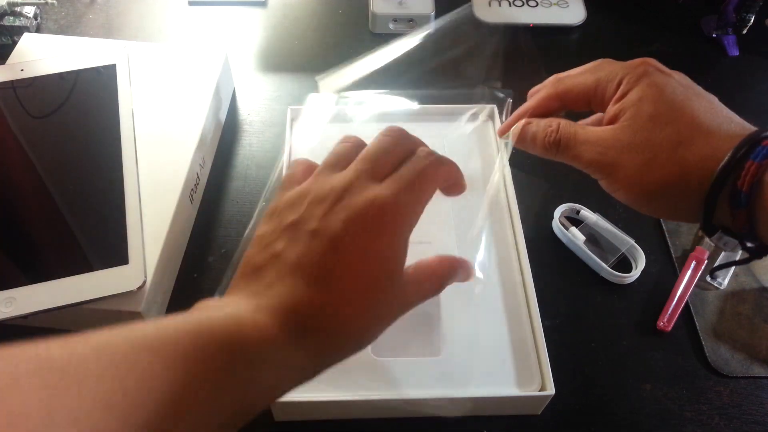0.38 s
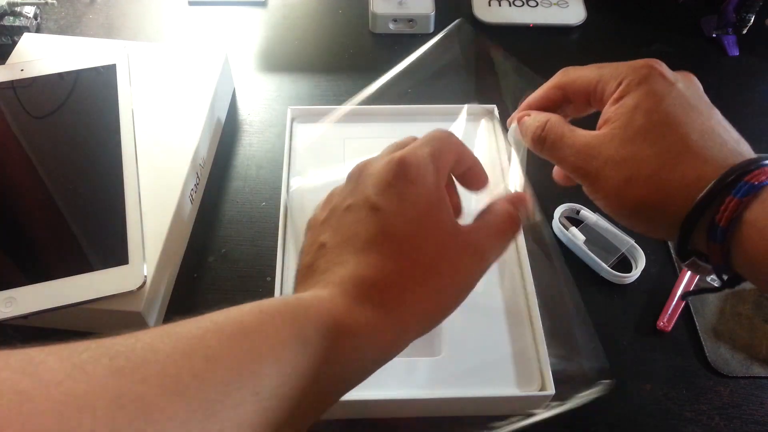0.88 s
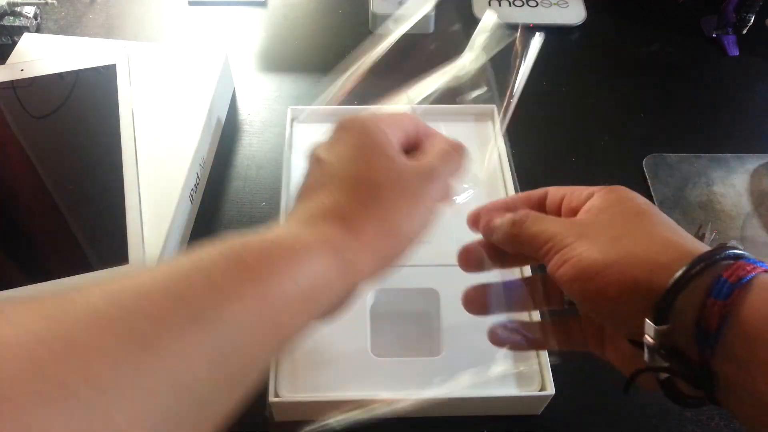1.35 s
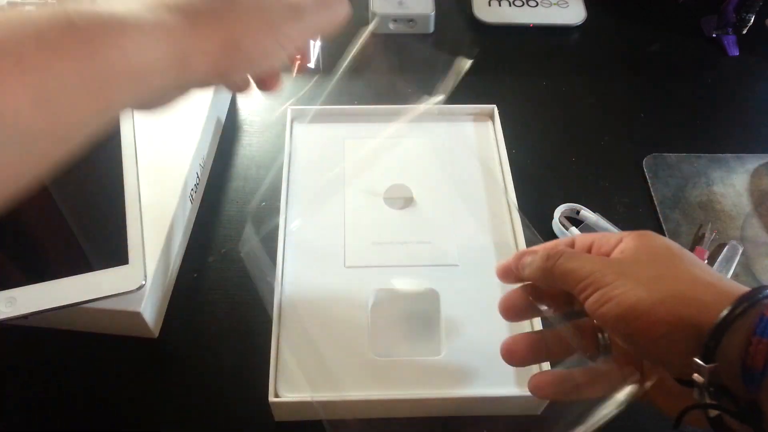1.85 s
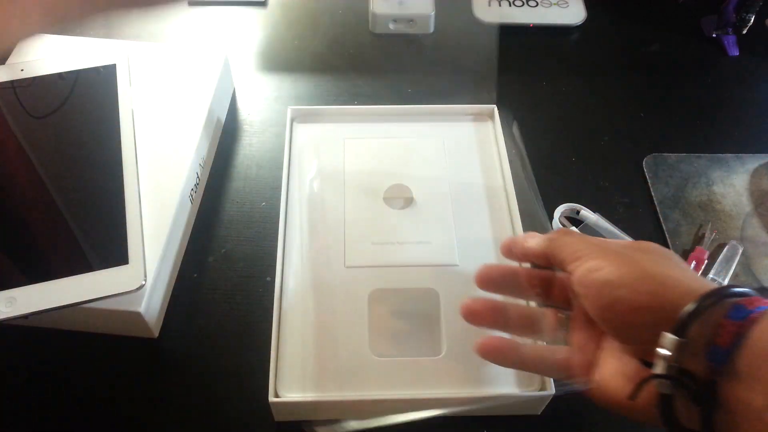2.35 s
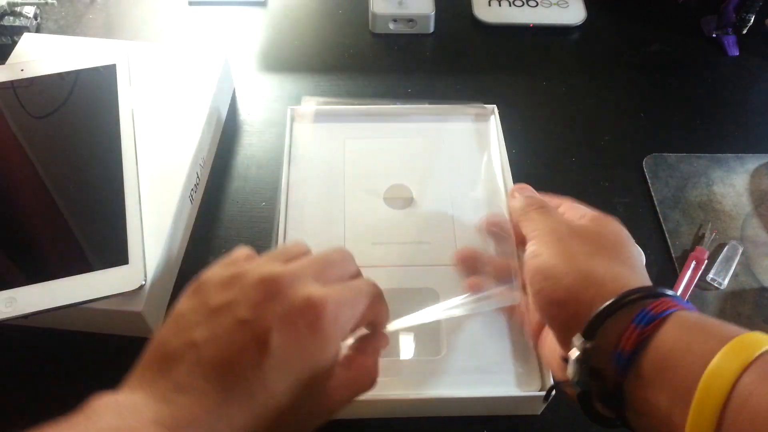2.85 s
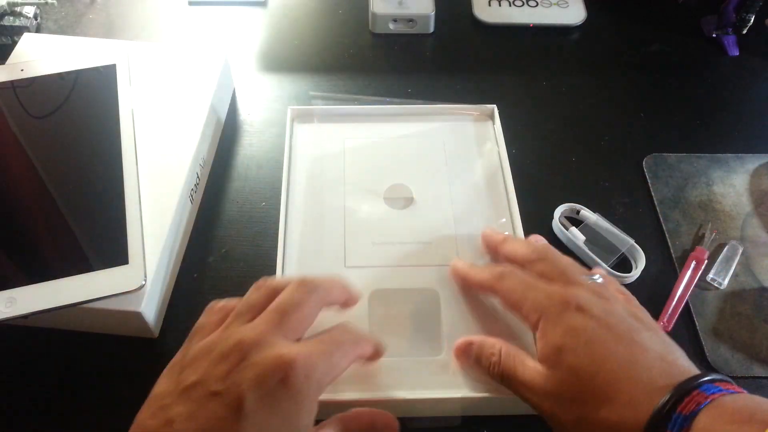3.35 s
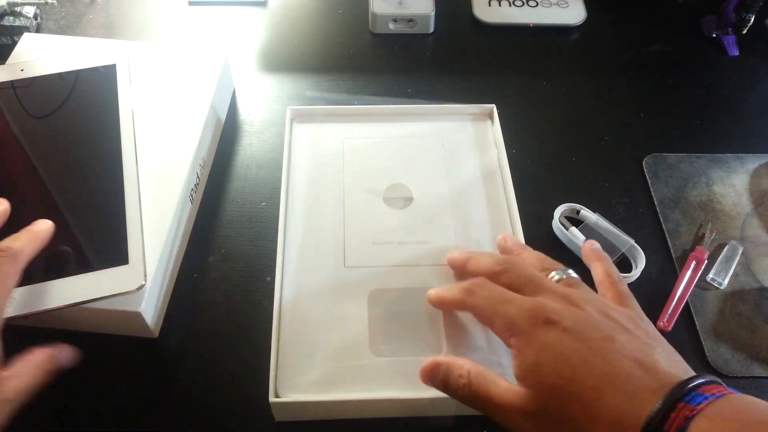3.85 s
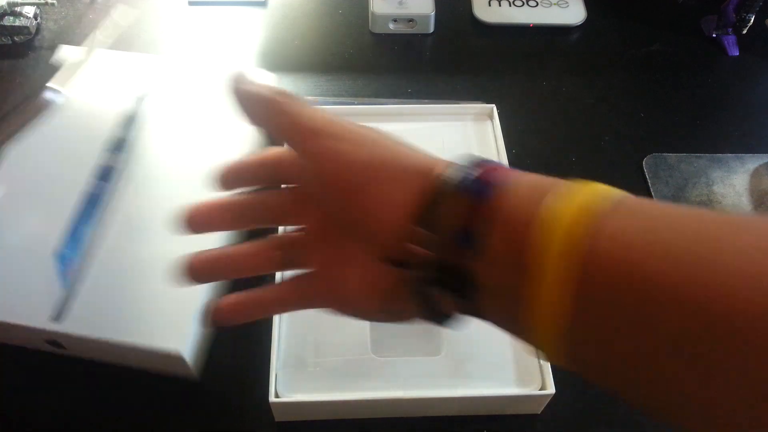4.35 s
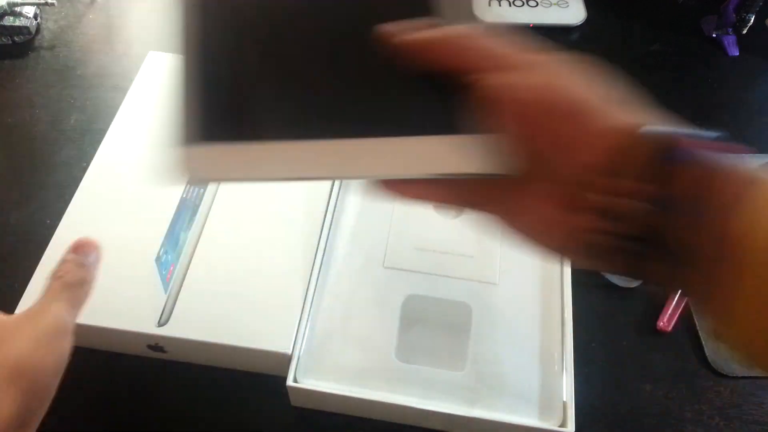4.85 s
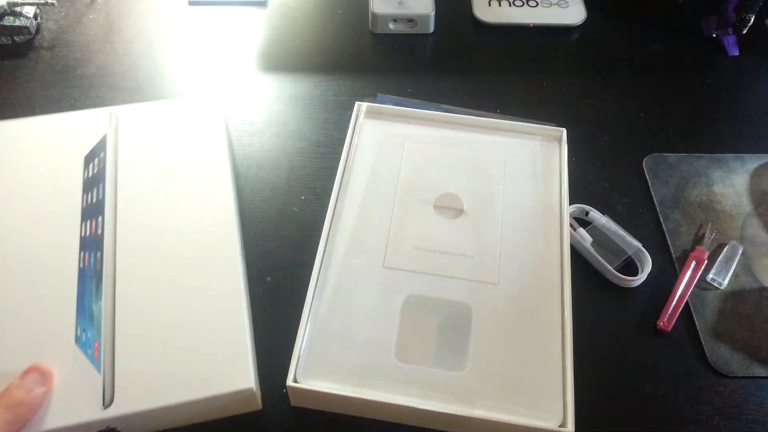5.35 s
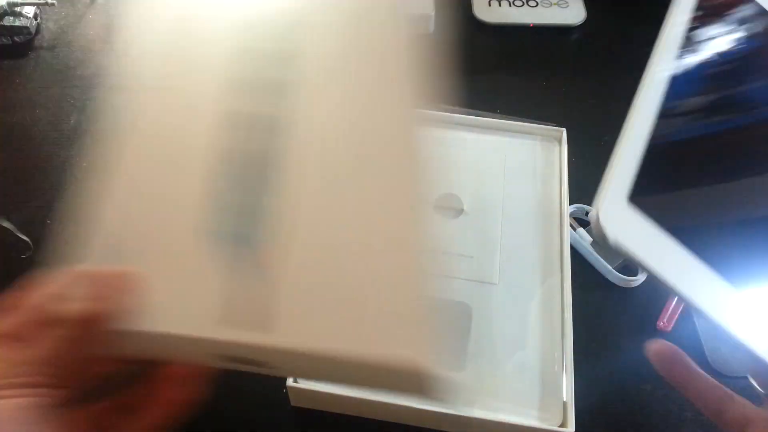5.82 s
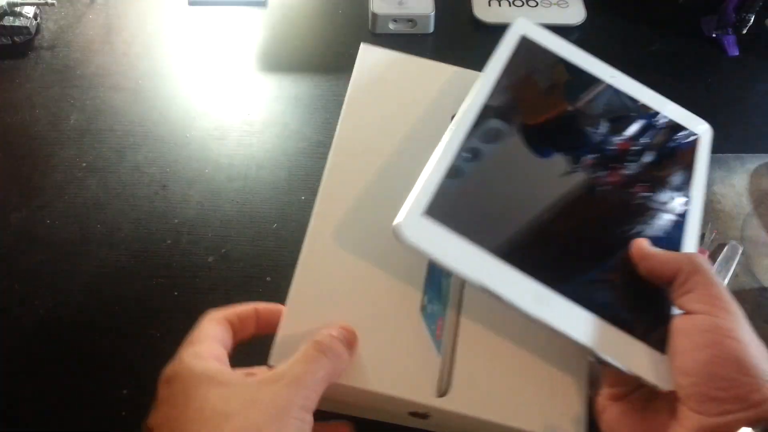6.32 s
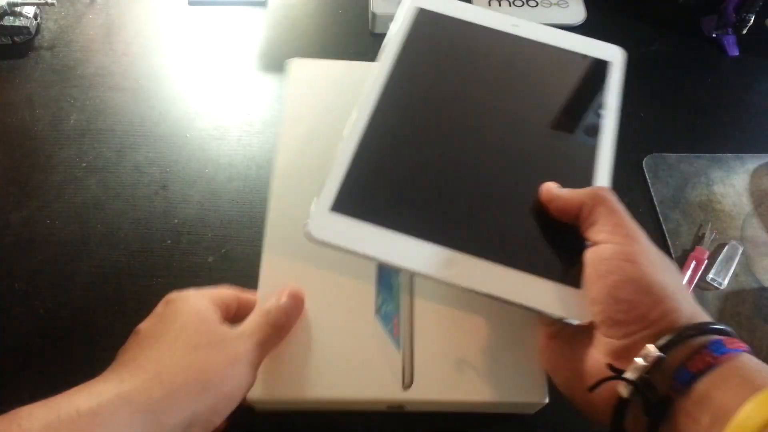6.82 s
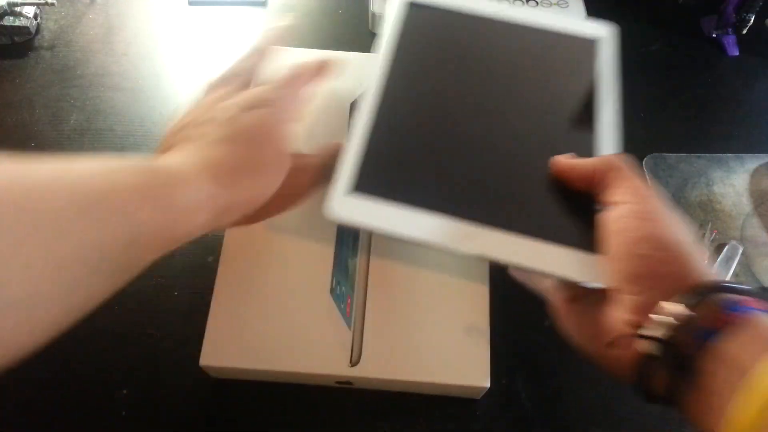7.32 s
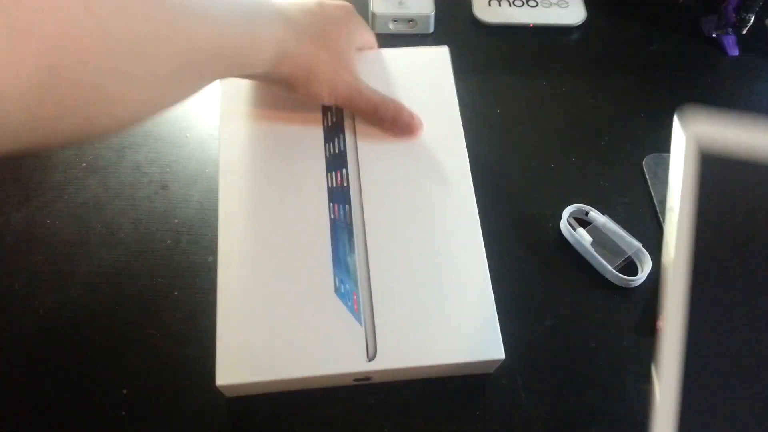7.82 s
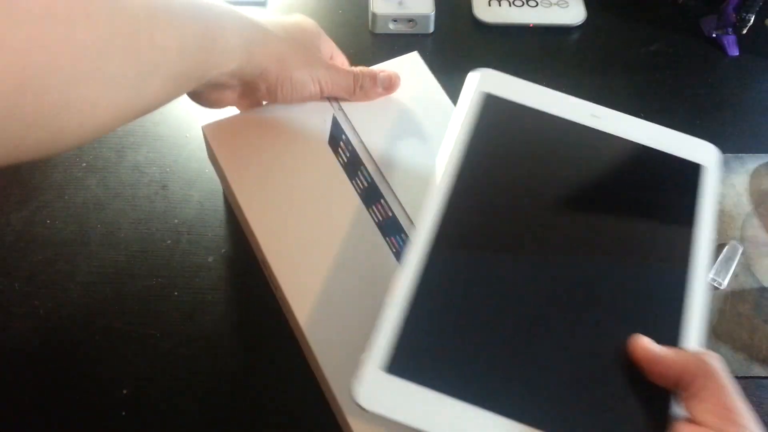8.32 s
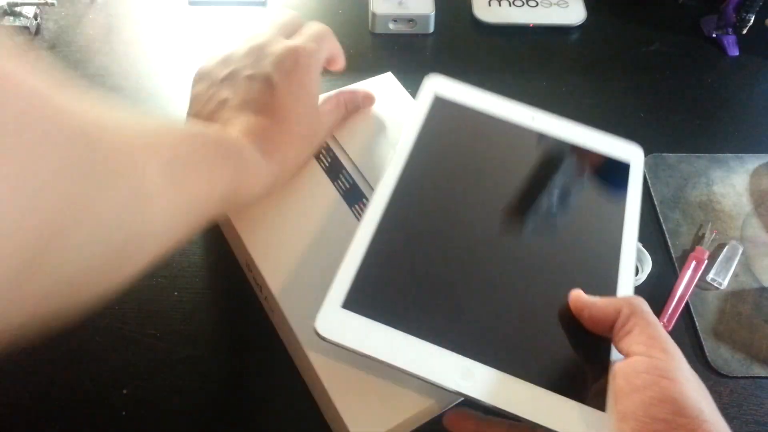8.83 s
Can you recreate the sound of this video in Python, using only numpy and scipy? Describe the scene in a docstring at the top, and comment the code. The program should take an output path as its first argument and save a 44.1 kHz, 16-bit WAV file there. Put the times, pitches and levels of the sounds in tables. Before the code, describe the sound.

Sharp plastic crinkling bursts in a small room, followed by a wavering cardboard drag hum, boxy thuds, shuffling and soft palm swishes.

```python
"""Stiff film and a cardboard box

Hands lift a stiff clear film off a cardboard tray: creases snap as ringing panels, grains of noise crinkle.
The hollow lid is dragged over the desk with a wavering hum, set down on the tray and patted shut: blows and
judders ring the box modes, friction drones and hisses, and palms wipe the card in short bright swishes.
A small furnished room adds diffuse echoes, air noise, rumble and a faint mains hum; two spaced microphones."""
import sys
import numpy as np
from scipy import signal
from scipy.fft import rfft, irfft, next_fast_len
from scipy.io import wavfile
from scipy.ndimage import uniform_filter1d

SR = 44100
rng = np.random.default_rng(int(sys.argv[2]) if len(sys.argv) > 2 else 0)


def transcribe(signal):
    """Save signal, clipped to [-1, 1], as a 16-bit WAV file at the path in sys.argv[1]."""
    frames = np.atleast_2d(signal).T
    limited = np.clip(frames, -1, 1)
    pcm = np.round(limited * 32767).astype(np.int16)
    wavfile.write(sys.argv[1], SR, pcm)


def rack_gain(trim_db):
    """Turn a fader trim in dB into the linear factor to multiply a signal by."""
    fader = np.asarray(trim_db, float)
    return 10 ** (fader / 20)


N = 405262

# creases of the film buckling, tick and crackle against the panel:
# start_s [s], level_db [dB], panel_hz [Hz], treble_db [dB], crackle_db [dB]
CREASES = [(0.0838, -29, 2600, -35, 8), (0.12, -38, 1160, -25, 0), (0.1354, -8, 3760, -34, -3),
           (0.3142, -37, 1390, -13.5, 4), (0.3862, -27, 2920, -39, 11), (0.449, -20.5, 2620, -31, -10),
           (0.502, -35, 1090, -25, 0.5), (0.5275, -31, 1280, -29, 0), (0.5457, -39, 3670, -21, 1.5),
           (0.5573, -21.5, 1220, -10, 16.5), (0.573, -38.5, 1290, 4, 8.5), (0.6668, -25.5, 2800, -15, 8),
           (0.6707, -21.5, 2350, -25, 3.5), (0.816, -47, 3890, -10, -29), (0.8804, -24.5, 4030, -23, -4.5),
           (0.9308, -23.5, 3950, 8, -4.5), (0.9446, -10, 3154, 1.5, 3.5), (1.0134, -30, 1060, -3, 9),
           (1.0517, -22, 4630, -9, -2), (1.0563, -11, 4460, -13.5, 3.5), (1.061, -13, 5500, -14, -10),
           (1.1601, -30.5, 1351, -29, 5.5), (1.2678, -21.5, 3360, -33.5, -11),
           (1.2914, -28.5, 1452, -40.5, -2), (1.3423, 0.5, 4214, -21.5, -3), (1.3488, 2.5, 4264, -4.5, 1),
           (1.3536, -1.5, 3900, -11, 5.5), (1.368, -2.5, 4756, 0.5, -4), (1.3717, -4, 1251, 8.5, -1.5),
           (1.3814, -7, 3000, 1, 10), (1.3966, -3.5, 4296, -8.5, -1.5), (1.4072, -1.5, 5160, -20.5, -2),
           (1.507, -23, 2750, -3.5, -2), (1.6046, -10, 3480, -20.5, 7.5), (1.6097, -3.5, 3400, -6.5, -1.5),
           (1.6134, -4.5, 3345, 5.5, -1), (1.6346, -2.5, 3514, -2, 2), (1.6816, -5, 2768, 1, 5),
           (1.7353, -0.5, 2840, -3, 5.5), (1.7374, 3.5, 3000, -5.5, -1), (1.7532, -2, 2850, -16, -2.5),
           (1.7565, -4.5, 2807, 3.5, -3.5), (1.79, 3, 3740, -10, -2.5), (1.795, 0, 3890, -10, -6.5),
           (1.8025, -1.5, 3730, -8.5, -0.5), (1.8124, 4.5, 3890, -6.5, -4.5), (1.8185, 0.5, 3880, 2, -12),
           (1.8219, 0.5, 3520, -11.5, -3), (1.8285, 1, 3866, -13, -0.5), (1.8355, 0.5, 3920, -1, -5.5),
           (1.8438, -3, 3790, -27, 0), (1.8481, -2.5, 3916, -19.5, -7.5), (1.8791, -5.5, 4950, -14.5, 0),
           (1.9056, 0.5, 3894, -2.5, 3), (1.9143, 1.5, 2675, -1, -6), (1.9245, -2, 3810, -13, 8.5),
           (1.9619, -6.5, 1870, -7.5, 0), (1.964, -2.5, 6000, -9, -0.5), (2.1254, -39.5, 1790, -6.5, 1.5),
           (2.212, -44.5, 2810, 13.5, 1), (2.3467, -42.5, 2060, -40.5, 16.5), (2.498, -52.5, 4060, 5.5, -5),
           (2.5592, -25.5, 3900, -26, -7), (2.582, -24.5, 4070, -30, -13), (2.652, -51.5, 3410, -22, 4),
           (2.7761, -34, 2130, -21, -4), (2.8366, -34.5, 1260, -2.5, 4), (2.888, -43, 2220, 2, 1),
           (2.936, -25, 1250, -31, -14), (2.949, -15, 5493, -17.5, 0.5), (3.2247, -29.5, 2760, -2, -19),
           (3.333, -24.5, 1450, -8, -12), (3.394, -38, 4950, -14, 5), (3.4251, -25, 1360, -58, 5.5),
           (3.5083, -34, 2100, -33, -17), (3.538, -45, 2220, 1, -1), (3.8228, -34.5, 1650, -24.5, 10.5),
           (3.839, -14.5, 2430, -29, -7.5), (3.8598, -24.5, 1570, -37, 0.5), (3.972, -49, 1000, -15, -6)]
# modes of the hollow box when free to ring: pitch_hz [Hz], level_db [dB, relative], t60_s [s]
BOX_MODES = [(106, -17, 0.1), (131.6, -13, 0.11), (196.5, -12.5, 0.076), (239.8, -5.5, 0.18),
             (291, 2.5, 0.066), (365, 0, 0.14), (449, -4.5, 0.097), (476.8, -9.5, 0.13), (523, -9.5, 0.1),
             (621.4, -13.5, 0.14), (756, -23, 0.16), (840, -7, 0.039), (1024, -7, 0.052),
             (1220, -9.5, 0.022), (1390, -12, 0.049), (1660, -20, 0.053), (2110, -44, 0.011)]
# how alike the two microphones hear a diffuse sound: pitch_hz [Hz], likeness [0-1]
STEREO_LIKENESS = [(60, 0.78), (180, 0.94), (550, 0.39), (1650, 0.27), (4970, 0.2), (15000, 0.011)]


def rms_one(x):
    """Scale to unit rms."""
    return x / np.sqrt(np.mean(x ** 2) + 1e-20)


def in_time(rows):
    """Columns of a curve at every sample, with a mask that is true only within its span."""
    s, *columns = np.transpose(rows)
    t = np.arange(N) / SR
    return (t >= s[0]) & (t <= s[-1]), [np.interp(t, s, c) for c in columns]


def at_hz(points, hz):
    """Read a spectrum on a log-frequency axis."""
    point_hz, values = np.array(points).T
    return np.interp(np.log(hz), np.log(point_hz), values)


def drift(rate_hz):
    """Slow random wander of spread 1: noise through two equal poles, run at a fortieth of the sample rate."""
    r = np.exp(-80 * np.pi * rate_hz / SR)
    noise = rng.standard_normal(N // 40 + 2002)
    slow = signal.lfilter([1], [1, -2 * r, r * r], noise)[2000:]   # drop the filter's start-up
    return np.interp(np.arange(N) / 40, np.arange(len(slow)), rms_one(slow))


def ring(drive, hz, t60_s):
    """A resonator: a unit click sets a sine of about height 1 ringing, 60 dB down after t60_s."""
    r, w = rack_gain(-60 / (t60_s * SR)), 2 * np.pi * hz / SR
    return signal.lfilter([0, np.sin(w)], [1, -2 * r * np.cos(w), r * r], drive + 1e-18)


def coloured(pair, spectrum):
    """Give two unrelated signals a spectrum and mix them to stereo that parts towards the treble; rms 1."""
    size = next_fast_len(N)
    hz = np.maximum(np.arange(size // 2 + 1) * SR / size, 1)
    alike = np.clip(at_hz(STEREO_LIKENESS, hz), 0, 1)
    mid, side = rfft(pair, size) * rack_gain(at_hz(spectrum, hz))
    stereo = np.sqrt(1 + alike) * mid + np.sqrt(1 - alike) * side * [[1], [-1]]
    return rms_one(irfft(stereo, size)[:, :N])


def brightened(x, bright_db, corner_hz):
    """Raise or lower the treble above a corner, by a fixed or moving amount."""
    low = signal.sosfiltfilt(signal.butter(1, corner_hz, fs=SR, output="sos"), x)
    return low + rack_gain(bright_db) * (x - low)


def grains(per_s, spread_db, clump_db):
    """Tiny noise clicks of uneven size that come in clumps, the same moments at both microphones."""
    born = rng.random(N) < per_s * rack_gain(clump_db * drift(25)) / SR
    sizes = rack_gain(spread_db * np.minimum(rng.exponential(1, N), 4))
    smear = np.exp(-np.arange(128) / 25.0)   # each grain dies away over 25 samples
    return np.convolve(born * sizes, smear)[:N] * rng.standard_normal((2, N))


def snaps(rows, cycles, second_db, after_ms):
    """A stiff sheet pops: the panel rings, 60 dB down in some cycles, with a sharp tick and a dying crackle."""
    out, t = np.zeros((2, N + 4096)), np.arange(4096) / SR
    treble = signal.butter(1, [5000, 12000], "band", fs=SR, output="sos")
    for s, level_db, hz, treble_db, crackle_db in rows:
        noise, chance = rng.standard_normal((3, 2, len(t))), rng.random(4)
        lag = np.array([[0], [(chance[0] - .5) * 1.0e-4]])   # s; the microphones are a few cm apart
        panel = np.sin(2 * np.pi * hz * (t + lag)) * rack_gain(-60 * t * hz / cycles)
        other_hz = hz * (0.89 + chance[1])   # a smaller facet beside it
        facet = np.sin(2 * np.pi * other_hz * (t - lag)) * rack_gain(-60 * t * other_hz / cycles)
        panel += rack_gain(second_db) * facet
        tick = rack_gain(treble_db) * signal.sosfilt(treble, noise[0] * np.exp(-t / 0.00091))
        around = signal.butter(1, [hz * 0.65, min(hz * 1.244, 18000)], "band", fs=SR, output="sos")
        flicker = np.abs(uniform_filter1d(noise[2, 0], size=24)) * 3.6 + .5
        dying = np.exp(-t / (max(after_ms, .3) / 1000)) * flicker
        # low pitches are alike at both microphones
        shared = noise[1, 0] + min(hz / 5000, 1) * noise[1, 1] * [[1], [-1]]
        crackle = signal.sosfilt(around, shared * dying)
        crackle = crackle + .5 * rack_gain(treble_db) * signal.sosfilt(treble, noise[2] * dying)
        at = round(s * SR)
        out[:, at:at + len(t)] += rack_gain(level_db) * (panel + tick + rack_gain(crackle_db) * crackle)
    return out[:, :N]


def film_crackle():
    """The flexed film crackles finely; each snap stirs the crackle up and it fades again."""
    # film being flexed: start_s [s], crackle_db [dB], bright_db [dB of treble]
    flex = [(0.0, -42, -11), (0.2, -43.5, -4.5), (0.3, -47, -2), (0.5, -60, -2), (0.8, -48, 0.5),
            (1.0, -70, 2), (1.3, -45.5, -3.5), (1.45, -33, 7), (1.58, -41.5, 5), (1.8, -44, 1),
            (1.98, -30, 2.5), (2.14, -51, -0.5), (2.25, -50, 12), (2.33, -38.5, -8.5), (2.42, -66, -16.5),
            (2.54, -64.5, 7.5), (2.6, -47, 6.5), (2.92, -53, -0.5), (3.12, -54.5, 1.5), (3.42, -42.5, -7.5),
            (3.6, -49, -5), (3.7, -60, -4), (3.81, -57, -3), (4.05, -61.5, -12.5)]
    # colour of the film: pitch_hz [Hz], level_db [dB per Hz, relative]
    film_spectrum = [(88, -48.5), (150, -14), (371, 0.5), (701, -12), (1160, -0.5), (1490, -7.5),
                     (2020, -5.5), (3890, -6), (4370, -7), (13900, -29.5), (15000, -18.5)]
    settle_db, settle_follows, settle_db_per_s = -23, 0.48, 228.5   # share of the snap's dB; fade
    loose_db = -8.5   # small creases popping at random, against the flex level
    moving, (flex_db, bright_db) = in_time(flex)
    s, level_db, _, _, crackle_db = np.transpose(CREASES)
    fade_db = settle_db_per_s * np.arange(N) / SR
    stirred_db = np.full(N, -200.)
    stirred_db[(s * SR).astype(int)] = settle_db + settle_follows * (level_db + crackle_db)
    settling_db = np.maximum.accumulate(stirred_db + fade_db) - fade_db
    fine = coloured(grains(per_s=3500.0, spread_db=2.5, clump_db=2.0), film_spectrum)
    loose = coloured(grains(per_s=49, spread_db=2.5, clump_db=2.0), film_spectrum)
    stir = np.hypot(rack_gain(flex_db), rack_gain(settling_db)) * fine + rack_gain(flex_db + loose_db) * loose
    return moving * brightened(stir, bright_db + 3.0 * drift(29.0), corner_hz=3000)   # treble wanders


def film():
    """Snaps and crackle of the thin film, with a short desk reflection that notches them."""
    sound = snaps(CREASES, cycles=24.0, second_db=-10.0, after_ms=4.6) + film_crackle()
    echo_s, echo_gain = .0007, 0.058
    lag = round(echo_s * SR)
    sound[:, lag:] += echo_gain * sound[:, :-lag].copy()
    # the left microphone faces the film
    sound = brightened(sound, np.array([[2.5], [-3.5]]), corner_hz=11000)
    # thin film moves little air
    sound = signal.sosfilt(signal.butter(2, 300, "high", fs=SR, output="sos"), sound)
    return sound * rack_gain([[-3.5], [-2.5]])


def edge_ticks():
    """Hard edges and nails touch card or desk: short rings with a brief rattle."""
    # start_s [s], level_db [dB], pitch_hz [Hz], treble_db [dB], rattle_db [dB]
    touches = [(4.4159, -15, 1460, -24, 0), (4.445, -26, 1190, -24.5, -6), (4.9668, -43, 1102, 0, 17.5),
               (5.459, -39.5, 1090, -20, 3), (5.889, -46.5, 1104, -20.5, -0.5),
               (6.1253, -42.5, 1203, -12.5, 3.5), (6.152, -11, 3860, -27, -16),
               (6.161, -23, 4000, -10.5, -18), (6.6249, -32, 1210, -19, 8.5),
               (7.3937, -44, 1270, -21, 15.5), (8.9144, -31, 3420, -12, -4), (8.9542, -35, 3350, -10, -6)]
    return snaps(touches, cycles=16.0, second_db=-29.0, after_ms=2.5)


def knocks_and_judders():
    """Each jolt pushes every box mode with its own strength; hard ones reach the upper modes and crack."""
    # blows on the box, and judders of the lid as it is dragged (5.09-5.27 s);
    # thump and hardness are before the box's response:
    # start_s [s], level_db [dB], thump_db [dB], hardness_db [dB], freedom to ring [0-1]
    jolts = [(0.394, -28, -16, -2, 0.95), (0.984, -27.5, -25, -8, 1), (2.979, -33.5, -2.5, 8, 0.66),
             (3.848, -28, -13, -1, 0.73), (4.106, -30, -7, -18, 0.86), (4.418, -4, -12.5, -10, 0.67),
             (4.441, -9.5, -20, -20, 0.76), (4.894, -39.5, 18, -33.5, 0.42), (4.971, -13, -14, -17.5, 0.41),
             (5.093, -13, -29, -24, 0.5), (5.14, -16, -41, -19, 1), (5.192, -13.5, -40, -20, 1),
             (5.274, -11.5, -27, -29, 0.38), (5.553, -13, -15.5, -18.5, 0.74), (6.147, 6, -43, -27, 0.34),
             (6.15, -1.5, -15, -5, 0.94), (6.329, -32, -21, -0.5, 0.3), (6.463, -5.5, -13, -24.5, 0.76),
             (6.498, -28, 1, -13, 1), (6.544, -20.5, -29, -14.5, 1), (6.624, -20.5, -20, -15, 0.47),
             (6.69, -25.5, -35, -8.5, 0.5), (6.728, -23.5, -14, -20, 0.9), (6.767, -11.5, -9.5, -17, 0.36),
             (6.923, 4, -18, -24.5, 0.59), (6.948, -18.5, 0, -5.5, 0.57), (7.089, -39, 6, -26, 0.44),
             (7.389, -33, -2, -24.5, 0.98), (7.503, -35.5, 2, -20, 0.6), (7.547, -11.5, -11, -19.5, 0.34),
             (7.616, -5, -14.5, -22.5, 0.42), (7.648, -22, -7, -25, 0.46), (7.873, -15.5, -11, -18, 0.4),
             (8.094, -31.5, -5.5, -18, 0.84), (8.255, -28.5, -3, -11, 0.4), (8.29, -3.5, -8, -25, 0.28),
             (8.369, -18.5, 3, -31, 0.21), (8.423, -19.5, -13, -15, 0.37), (8.535, -30, -6.5, -24, 0.7),
             (8.88, -27.5, -1, -18, 0.9)]
    panel_db, edge_db = 9.5, 12   # how readily the broad panels and the stiff edges respond
    contact_ms = 1.12   # rise time of a mode at 368 Hz; lower modes rise more slowly
    out, t = np.zeros(N + 8192), np.arange(8192) / SR
    hz, mode_db, t60_s = np.transpose(BOX_MODES)[:, :, None]
    polarity = (-1) ** np.arange(len(BOX_MODES))[:, None]
    card = signal.butter(2, [600, 2500], "band", fs=SR, output="sos")
    for s, level_db, thump_db, hard_db, free in jolts:
        chance, noise = rng.standard_normal((2, len(BOX_MODES), 1)), rng.standard_normal(len(t))
        colour_db = np.where(hz < 300, thump_db + panel_db, np.where(hz > 700, hard_db + edge_db, 0))
        strength = rack_gain(mode_db + colour_db + 2.0 * chance[0])
        swell = 1 - np.exp(-t * hz / 368 / (contact_ms / 1000))   # a soft push moves slow modes late
        decay = rack_gain(-60 * t / (t60_s * max(free, .1)))
        modes = np.sin(2 * np.pi * hz * (1 + 0.023 * chance[1]) * t) * decay
        body = np.sum(strength * swell * modes * polarity, axis=0)
        crack = rack_gain(hard_db + 2.5) * signal.sosfilt(card, noise * np.exp(-t / 0.012))
        at = round(s * SR)
        out[at:at + len(t)] += rack_gain(level_db - 8.5) * (body + crack)
    return out[:N]


def drag_level():
    """Amplitude of the lid's drag over the desk."""
    # the lid is dragged twice, one curve each: start_s [s], level_db [dB]
    drags = [
        [(4.2, -54), (4.25, -41.5), (4.4, -32), (4.57, -34.5), (4.63, -41.5), (4.72, -57.5)],
        [(5.0, -45.5), (5.09, -33.5), (5.21, -36), (5.37, -39), (5.46, -48), (5.62, -41.5), (5.73, -80)],
    ]
    return sum(moving * rack_gain(db) for moving, (db,) in map(in_time, drags))


def dragging():
    """The slips of the lid's edge lock onto the cavity under it: a hum whose pitch and strength waver."""
    cavity_hz, hum_db = 370.5, 0.5   # hum against the drag level at its peak
    locking = 1.55   # power of the drag level: the hum grows faster than the drag
    drag = drag_level()
    waver = rack_gain(3.5 * drift(22.0))
    strength = rack_gain(hum_db) * waver * drag.max() * (drag / drag.max()) ** locking
    pitch_hz = cavity_hz * (1 + 0.018 * drift(15.5))
    return strength * np.sqrt(2) * np.sin(2 * np.pi * np.cumsum(pitch_hz) / SR)


def palm_wipes(hiss):
    """A palm wipes over glossy card: short bright swishes, each a band of the friction hiss."""
    # start_s [s], length_s [s], level_db [dB], centre_hz [Hz]
    swishes = [(6.716, 0.24, -49.5, 6800), (7.406, 0.05, -54, 3200), (7.533, 0.075, -47.5, 5000),
               (8.02, 0.17, -56, 4600), (8.537, 0.11, -47, 5040), (8.806, 0.095, -46, 6300),
               (9.063, 0.22, -50, 3200)]
    span = 2.1   # the band reaches this factor above and below its centre
    t, out = np.arange(N) / SR, 0
    for s, length, level_db, hz in swishes:
        swell = np.sqrt(np.abs(np.sin(np.pi * np.clip((t - s) / length, 0, 1))))
        band = signal.butter(2, [hz / span, hz * span], "band", fs=SR, output="sos")
        out = out + rack_gain(level_db) * swell * rms_one(signal.sosfilt(band, hiss))
    return out


def sliding():
    """Friction shakes the box modes into a lumpy drone and hisses on the paper surface; returns both."""
    # lid and hands sliding on the tray: start_s [s], drone_db [dB], hiss_db [dB]
    slide = [(6.126, -61, -35.5), (6.2, -49, -48), (6.3, -45.5, -51), (6.44, -55, -50.5),
             (6.6, -43.5, -47.5), (6.75, -47.5, -46), (6.95, -45.5, -47), (7.25, -49.5, -51.5),
             (7.36, -72, -68), (7.4, -55.5, -53.5), (7.56, -52, -51.5), (7.72, -50.5, -48),
             (8.14, -45.5, -46.5), (8.24, -58.5, -58), (8.32, -46, -52), (8.47, -50.5, -47),
             (8.75, -47, -51.5), (8.95, -50, -50), (9.05, -69, -62.5), (9.19, -46, -50)]
    # colour of the paper hiss: pitch_hz [Hz], level_db [dB per Hz, relative]
    hiss_spectrum = [(410, -27), (700, -4), (1040, -9.5), (1140, -5), (1950, -10), (5240, -11),
                     (6190, -16.5), (13900, -24), (15000, -18.5)]
    drag_drone_db, drag_hiss_db = -4, -7.5   # what the drag sets going, against its level
    slide_bright_db, drag_bright_db = -4, -1   # treble while sliding; about that at full drag
    drag_brightens = 0.26   # dB of treble gained per dB of drag
    moving, (drone_db, hiss_db) = in_time(slide)
    friction = rng.standard_normal(N) * rack_gain(2.0 * drift(30))
    drone = 0
    for k, (hz, mode_db, t60_s) in enumerate(BOX_MODES):
        rubbed_db = mode_db - 2.4 * (hz < 300)   # rubbing moves the broad, heavy panels less
        drone = drone + (-1) ** k * rack_gain(rubbed_db) * ring(friction, hz, t60_s)
    drone = rms_one(drone)
    hiss = coloured(grains(per_s=8000.0, spread_db=3.0, clump_db=1.5), hiss_spectrum)
    drag = drag_level()
    wipes = palm_wipes(hiss)
    drag_db = 20 * np.log10(drag / drag.max() + .01)
    bright_db = np.where(moving, slide_bright_db, drag_bright_db + drag_brightens * drag_db)
    bright_db = bright_db + 3.0 * drift(7.1)   # the treble wanders
    rub = moving * rack_gain(hiss_db) + rack_gain(drag_hiss_db) * drag
    drone_level = moving * rack_gain(drone_db) + rack_gain(drag_drone_db) * drag
    return drone_level * drone, rub * brightened(hiss, bright_db, corner_hz=3000) + wipes


def room(x):
    """Diffuse echoes: noise that dies band by band, different at each microphone."""
    # reverberation: pitch_hz [Hz], t60_s [s]
    decay_times = [(150, 0.4), (400, 0.19), (1000, 0.25), (3000, 0.27), (8000, 0.28)]
    focus = 0.75   # under 1: echoes are more alike left and right than the air noise
    t, tail = np.arange(int(.5 * SR)) / SR, 0
    for hz in 60 * 2.0 ** np.arange(8):
        band = signal.butter(2, [hz, 2 * hz], "band", fs=SR, output="sos")
        pair = signal.sosfilt(band, rng.standard_normal((2, len(t))))
        alike = np.clip(at_hz(STEREO_LIKENESS, hz * 1.2), 0, 1) ** focus
        pair = np.sqrt(1 + alike) * pair[0] + np.sqrt(1 - alike) * pair[1] * [[1], [-1]]
        tail = tail + pair * rack_gain(-60 * t / at_hz(decay_times, hz * 1.19))
    tail = tail * np.clip((t - .004) / .008, 0, 1)   # first walls answer after a few ms
    return signal.fftconvolve(x, tail / np.sqrt(np.sum(tail ** 2) / 2), axes=1)[:, :N]


def quiet_room():
    """Steady air and microphone noise, a low rumble and a mains hum of wavering level."""
    # colour of the quiet room: pitch_hz [Hz], level_db [dB per Hz, relative]
    air_spectrum = [(53, -33.5), (90, -2.5), (241, 2.5), (543, -6.5), (749, -13), (1010, -11.5),
                    (1310, -15), (1520, -15.5), (6510, -22.5), (11100, -20.5), (15000, -21)]
    air_db, rumble_db, hum_hz, hum_db = -57.5, -71, 61, -71   # rms levels, the hum before its waver
    air = coloured(rng.standard_normal((2, N)), air_spectrum)
    rumble_spectrum = [(20, -21.5), (40, -13.5), (50, -1.0), (65, -3.5), (85, -18.0), (200, -57.5)]
    rumble = coloured(rng.standard_normal((2, N)), rumble_spectrum)
    hum = np.sqrt(2) * np.sin(2 * np.pi * hum_hz * np.arange(N) / SR) * rack_gain(2.5 * drift(4))
    return rack_gain(air_db) * air + rack_gain(rumble_db) * rumble + rack_gain(hum_db) * hum


def scene():
    """Film, box and hands close to the microphones, in the room."""
    box_lag_s = .0001   # the box reaches the left microphone later
    near_room_db, box_room_db = -11.5, -7   # sends to the echoes
    drone, hiss = sliding()
    box = (knocks_and_judders() + drone + dragging()) * rack_gain([[-.3], [.3]])
    box[0] = np.interp(np.arange(N) - box_lag_s * SR, np.arange(N), box[0])
    near = film() + edge_ticks() + hiss
    handled = near + box + room(rack_gain(near_room_db) * near + rack_gain(box_room_db) * box)
    no_bass = signal.butter(4, 95, "high", fs=SR, output="sos")   # small objects radiate no deep bass
    return signal.sosfilt(no_bass, handled) + quiet_room()


def roll_off(x):
    """The treble ends steeply here."""
    return signal.sosfilt(signal.butter(12, 15600, fs=SR, output="sos"), x)


def record(dry):
    """The very top is cut and peaks beyond the limit overload."""
    cut = signal.sosfilt(signal.cheby2(10, 50, 15700, fs=SR, output="sos"), dry)
    mix = np.clip(cut, -1.05, 1.05)
    return roll_off(mix)


dry = scene()
out = record(dry)
transcribe(out)
```